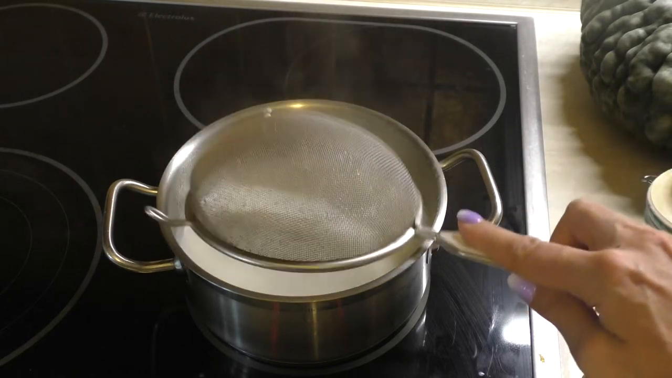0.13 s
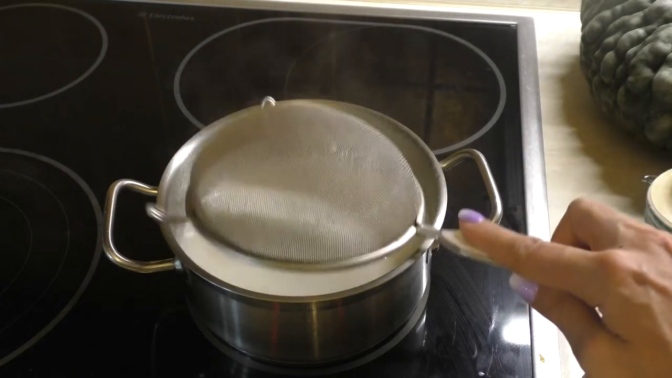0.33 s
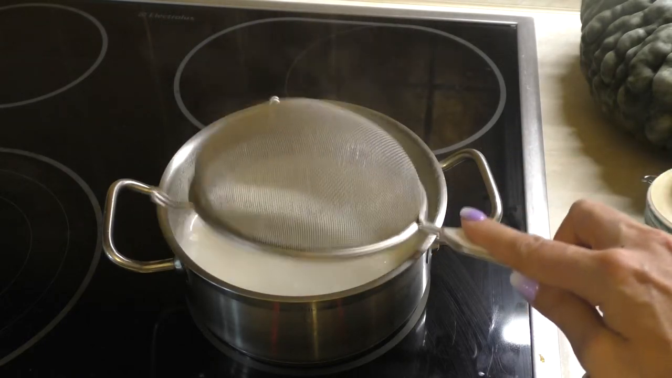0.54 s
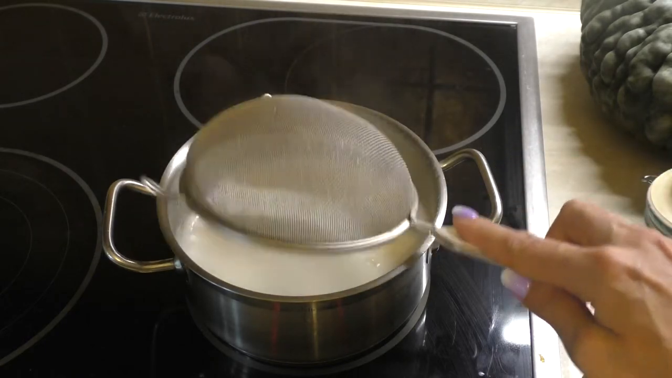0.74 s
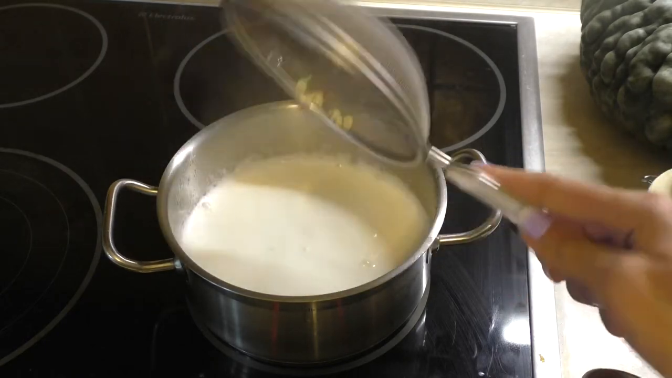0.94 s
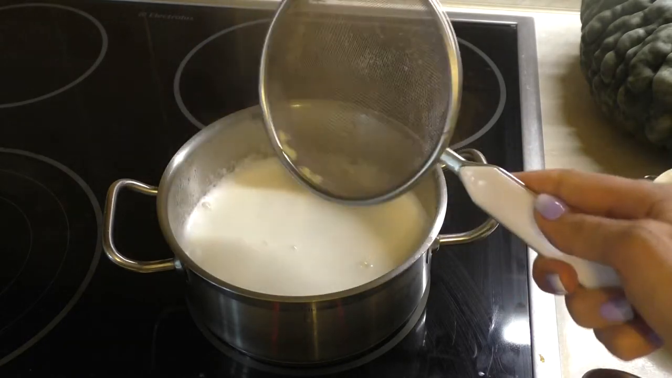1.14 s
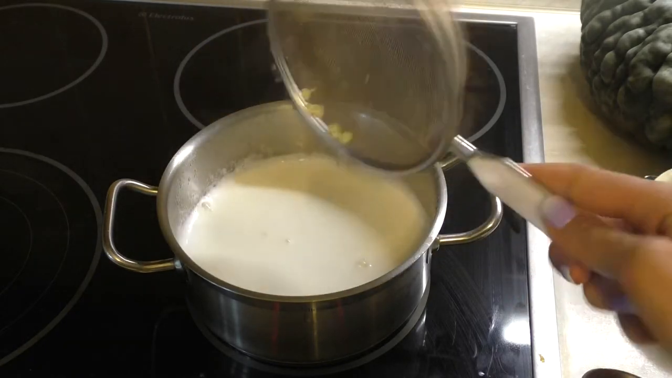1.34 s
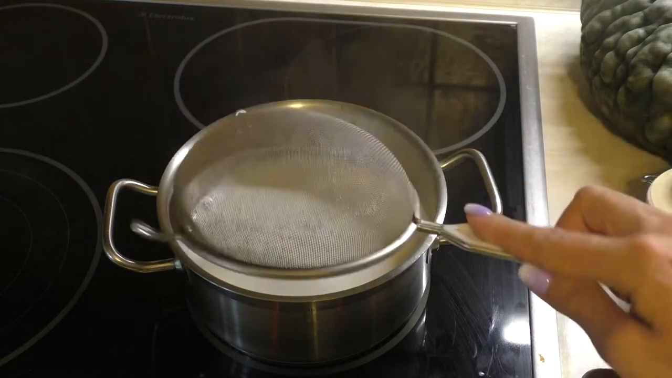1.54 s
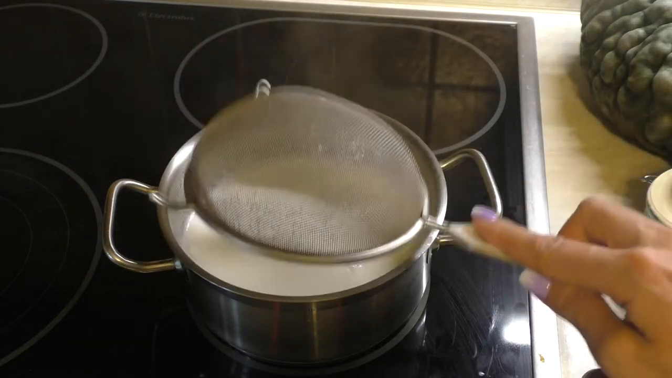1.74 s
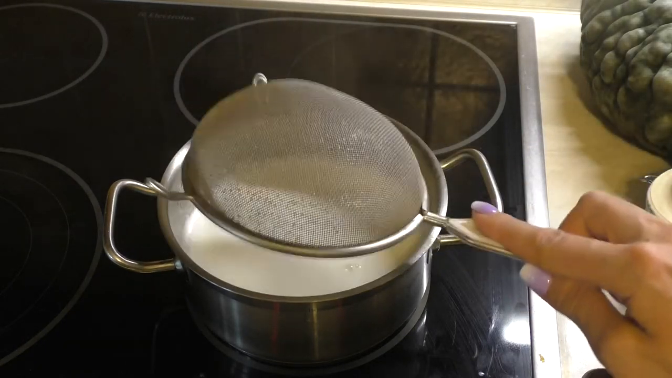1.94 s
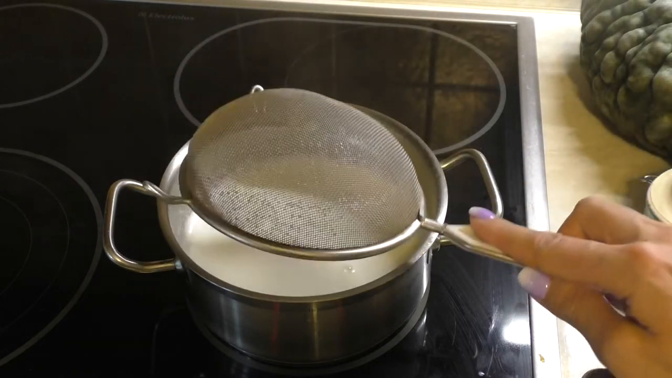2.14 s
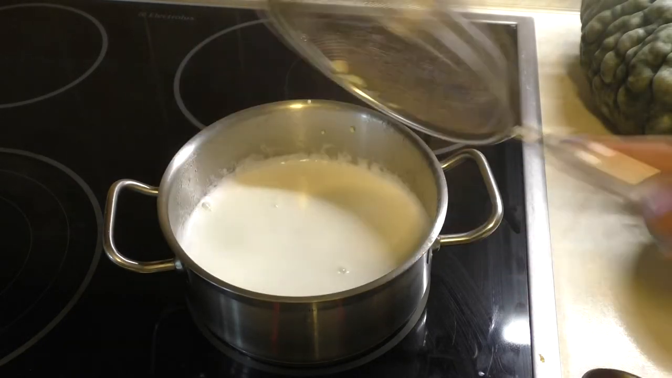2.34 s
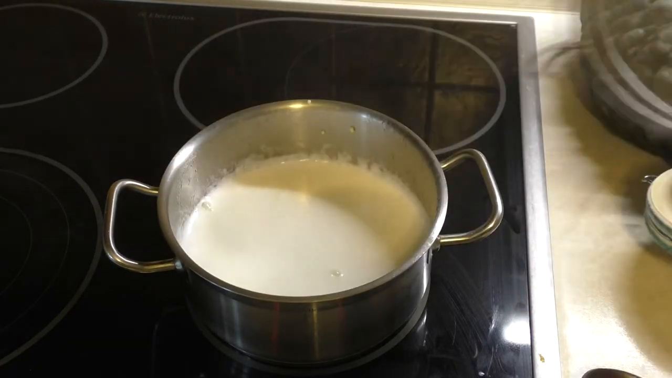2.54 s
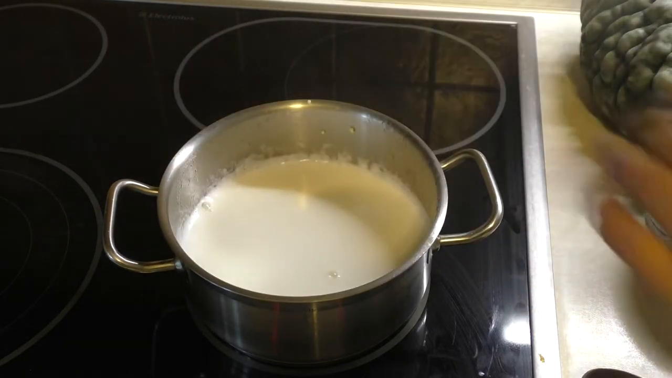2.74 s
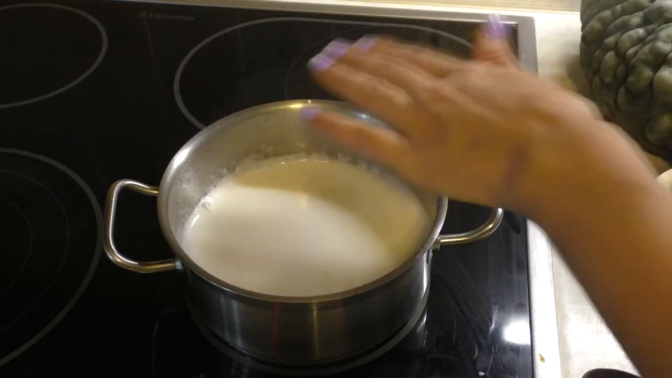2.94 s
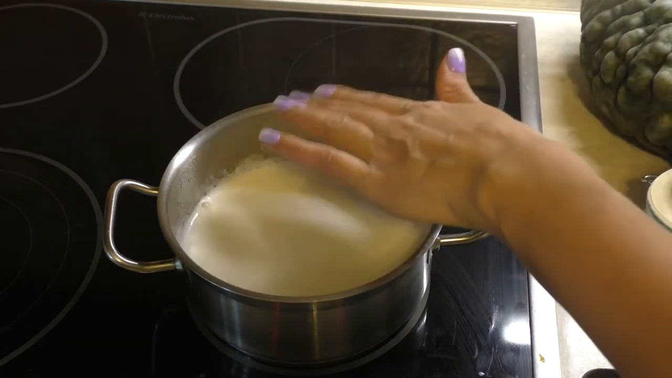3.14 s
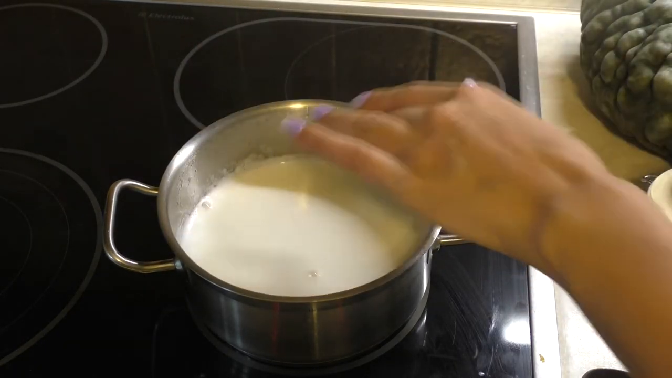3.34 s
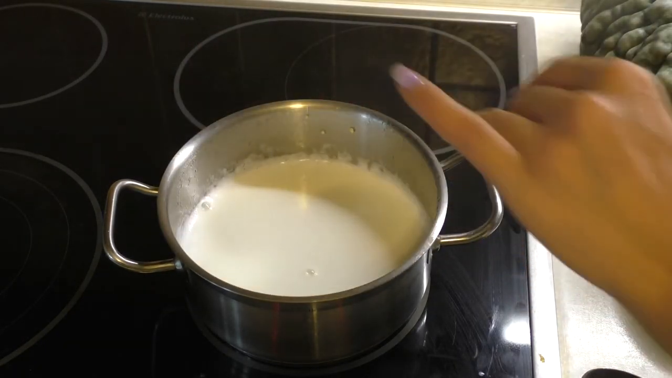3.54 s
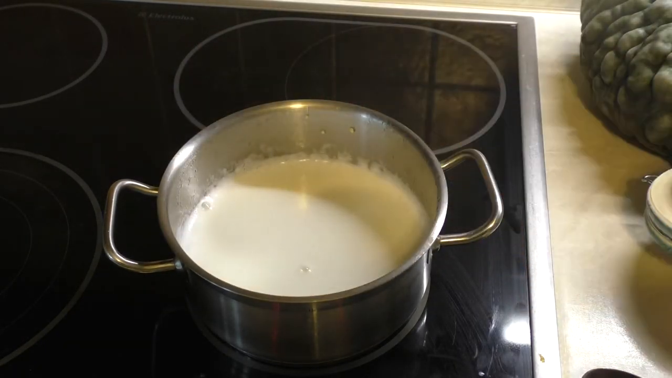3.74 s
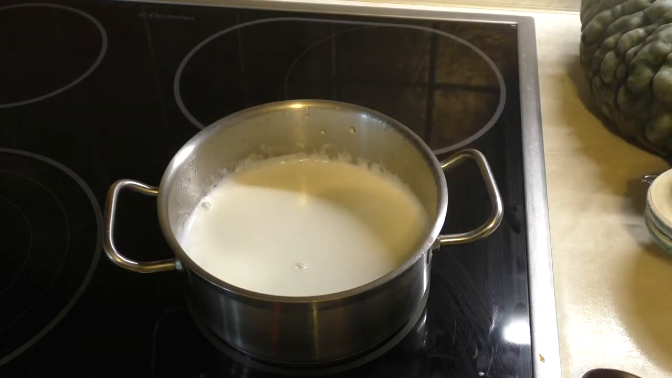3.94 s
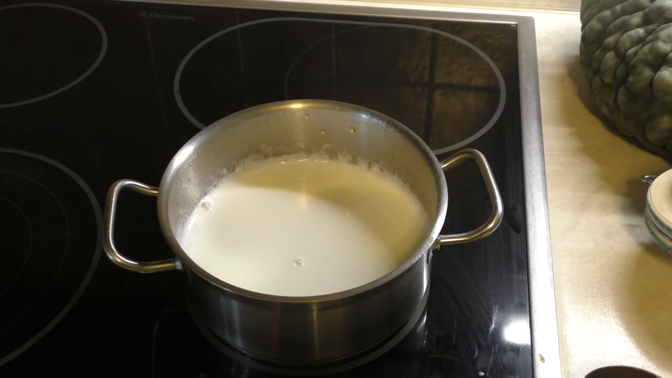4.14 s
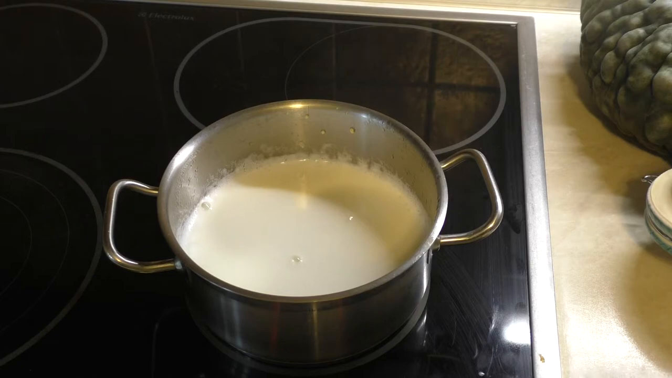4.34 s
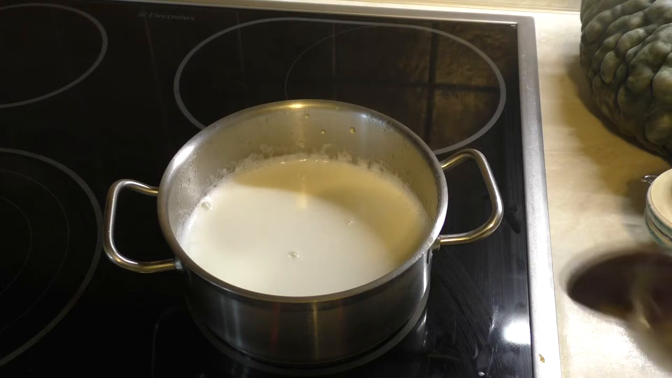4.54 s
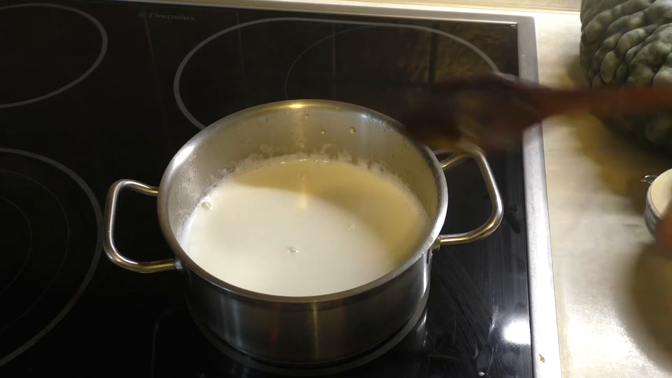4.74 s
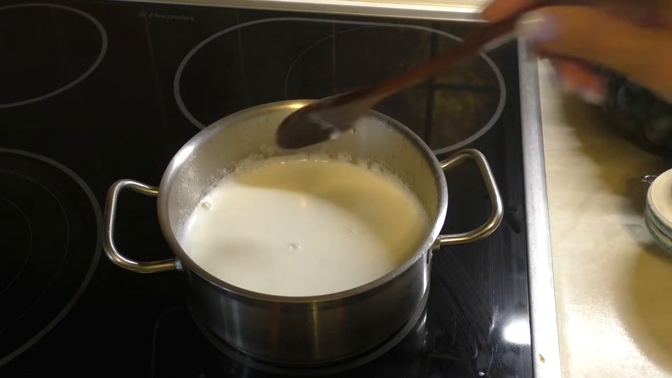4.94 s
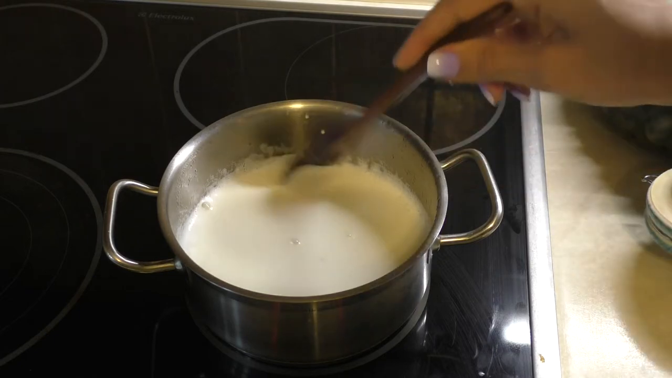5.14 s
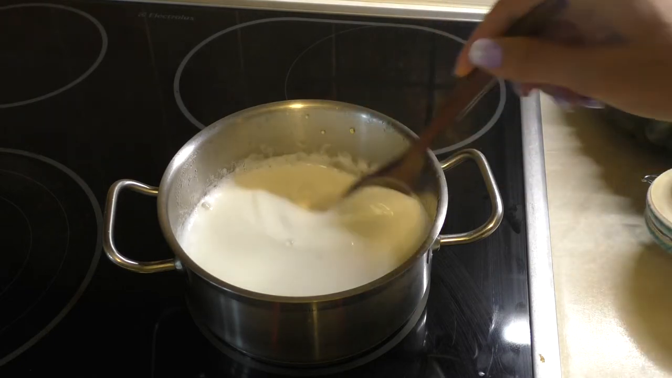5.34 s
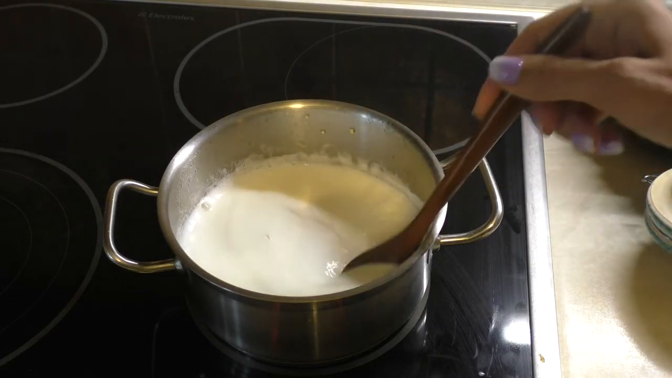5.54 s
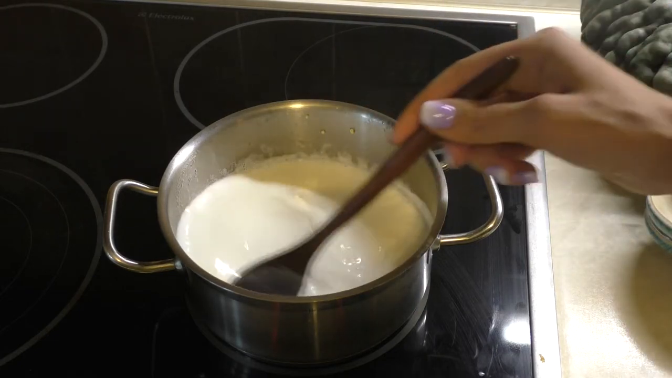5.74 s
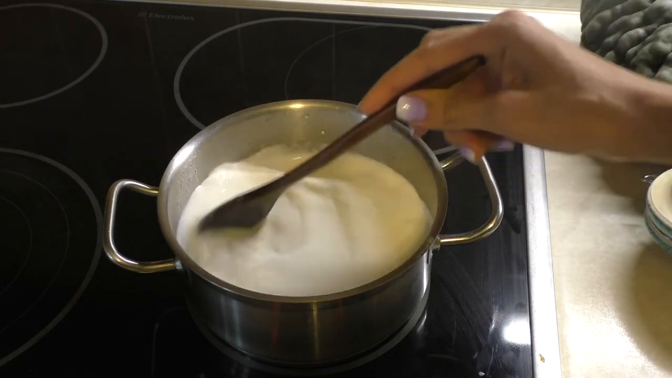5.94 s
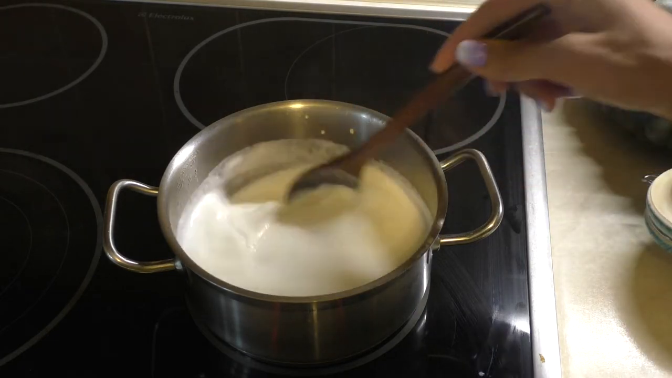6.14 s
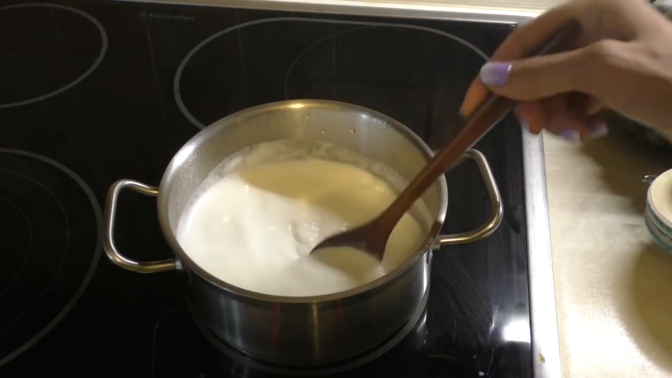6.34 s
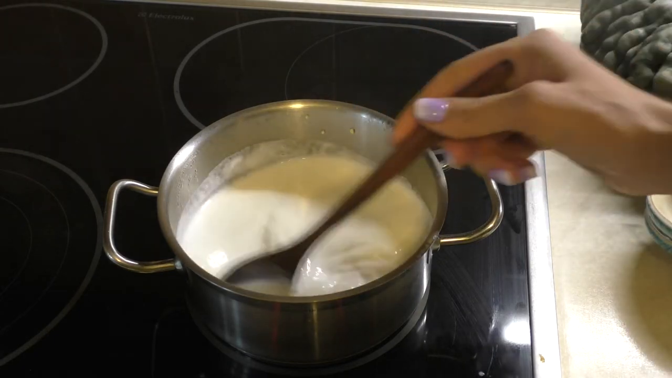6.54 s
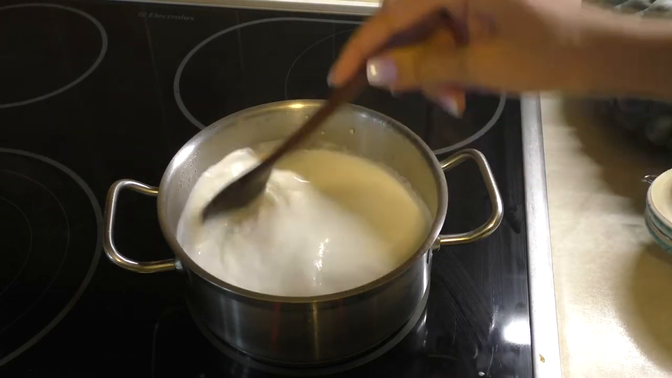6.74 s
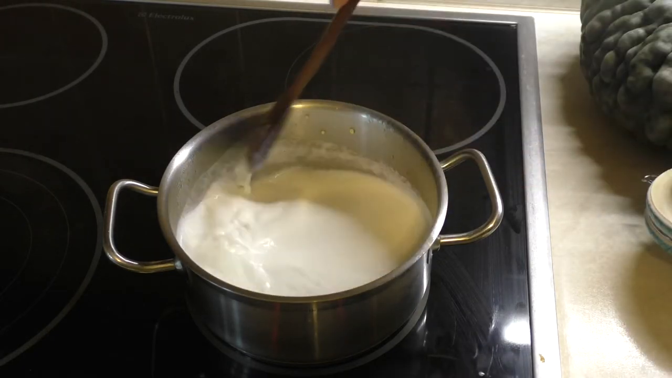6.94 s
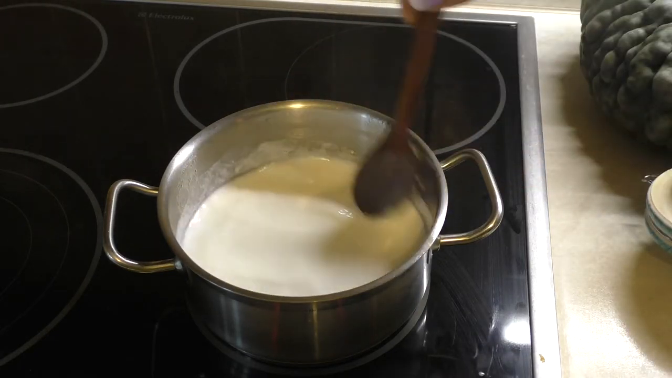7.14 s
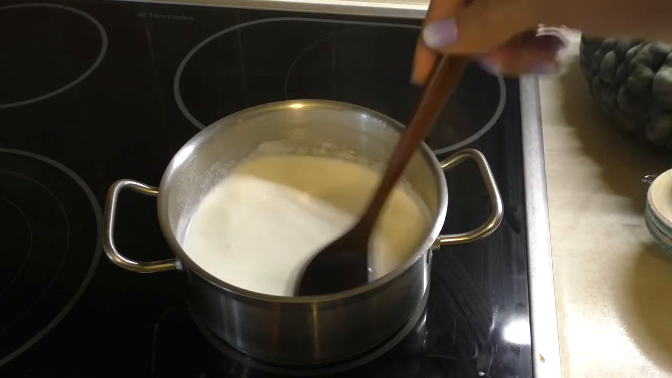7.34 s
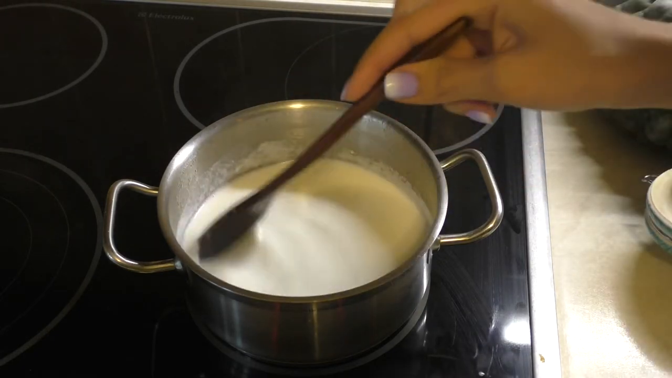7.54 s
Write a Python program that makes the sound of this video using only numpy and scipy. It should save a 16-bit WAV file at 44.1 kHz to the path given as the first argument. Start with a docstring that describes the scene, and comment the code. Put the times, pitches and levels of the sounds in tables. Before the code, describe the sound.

Sharp metallic clicks with rattling mesh: five evenly spaced sieve taps on a pan rim, a pause, then three more. Things are put down with a hard clatter on a worktop, followed by one light clink. A wooden spoon clacks against the steel, swishes softly through the milk, knocks again and rubs along the wall. Near microphone, short room reverberation, faint steady stove whir.

```python
"""A wire sieve taps the rim of a steel saucepan of milk: contact noise, ringing hoop modes, jangling wire noise.
It is then put down among utensils: knocks on and around the counter, tinks, a clink. Low modes thump throughout.
A wooden spoon knocks the pan (noise and modes), stirs the milk (filtered grains) and scrapes the wall (friction).
The hob whirs and hums (noise and a sine). A small kitchen answers; the gain ducks after each loud blow."""
import sys
import numpy as np
from scipy import signal
from scipy.fft import rfft, irfft, next_fast_len
from scipy.io import wavfile
from scipy.ndimage import uniform_filter1d, map_coordinates

SR = 44100
rng = np.random.default_rng(int(sys.argv[2]) if len(sys.argv) > 2 else 0)


def wav_out(sig):
    """Save sig, one row per channel (or a flat mono array), as 16-bit PCM at SR to the path in sys.argv[1]."""
    wavfile.write(sys.argv[1], SR, np.round(np.clip(np.atleast_2d(sig).T, -1, 1) * 32767).astype(np.int16))


N = 334719
TIME = np.arange(N) / SR
AGE = np.arange(SR) / SR


def amp(db):
    """Decibels to gain."""
    return 10 ** (np.asarray(db) / 20)


def unit(x):
    """Scale to rms 1."""
    return x / np.sqrt(np.mean(x ** 2) + 1e-20)


def fade(t, t60_s):
    """Exponential decay by 60 dB in t60_s, at least 1 ms."""
    return np.exp(-np.log(1000) * t / np.maximum(t60_s, 1e-3))


def along(points, hz, axis=1):
    """One column of a table, interpolated over log frequency."""
    columns = np.transpose(points)
    return np.interp(np.log(hz + 1), np.log(columns[0] + 1), columns[axis])


def wobble(knots_hz, size=N):
    """Smooth random curve through knots_hz normal random knots a second."""
    knots = rng.standard_normal(int(size * knots_hz / SR) + 4)
    return map_coordinates(knots, [TIME[:size] * knots_hz])


def hump(peak_s, length_s):
    """Gain of a raised-cosine swell, length_s from end to end."""
    return np.cos(np.pi * np.clip((TIME - peak_s) / length_s, -.5, .5)) ** 2


def grains(rate_hz, spread_db):
    """Random impulses of uneven size and sign, rate_hz a second on average."""
    chance, size, sign = rng.random(N), rng.standard_normal(N), rng.standard_normal(N)
    return (chance < rate_hz / SR) * amp(spread_db * size) * np.sign(sign)


def filtered(x, response):
    """x times a response of frequency."""
    n = x.shape[-1]
    padded = next_fast_len(n + SR // 4)
    spectrum = rfft(x, padded) * response(np.fft.rfftfreq(padded, 1 / SR))
    return irfft(spectrum, padded)[..., :n]


def coloured(x, spectrum, size=2048):
    """Causal minimum-phase filter with the given spectrum, by folding its cepstrum."""
    cepstrum = irfft(np.log(amp(along(spectrum, np.fft.rfftfreq(size, 1 / SR)))))
    cepstrum[1:size // 2] *= 2
    cepstrum[size // 2 + 1:] = 0
    impulse = irfft(np.exp(rfft(cepstrum)))
    return signal.fftconvolve(x, impulse)[:len(x)]


def gliding(x, hz, width_hz):
    """x through one resonance whose frequency moves: shift to 0 Hz, low-pass, shift back; rms 1."""
    turn = np.exp(2j * np.pi * np.cumsum(hz) / SR)
    pole = np.exp(-np.pi * width_hz / SR)
    return unit(np.real(turn * signal.lfilter([1 - pole], [1, -pole], x / turn)))


def add(track, s, sound):
    """Mix a sound into the track at time s, cut at both ends of the track."""
    start = round(s * SR)
    sound = sound[:, max(-start, 0):N - start]
    track[:, max(start, 0):][:, :sound.shape[1]] += sound


def ring(modes, scatter_db=2):
    """Decaying sines with random strengths and phases, each detuned a little at random."""
    hz, db, t60_s = np.transpose(modes)[:, :, None]
    hz = hz * (1 + .0015 * rng.standard_normal(hz.shape))
    strength = amp(db + scatter_db * rng.standard_normal(hz.shape))
    phase = rng.uniform(0, 2 * np.pi, hz.shape)
    tones = strength * fade(AGE, t60_s) * np.sin(2 * np.pi * hz * AGE + phase)
    return np.sum(tones, 0) * (1 - fade(AGE, 0.0053))


# Extra level per dB of hardness for thud, clank, clack and click, in dB per dB.
HARDNESS_DB_PER_DB = (-0.61, -0.26, 0.45, 1.15)


def blow(voice_db, db, hardness_db=0):
    """Thud, clank, clack and click of one blow: the harder the contact, the more treble."""
    return db + np.array(voice_db) + hardness_db * np.array(HARDNESS_DB_PER_DB)


# Edges of the thud, clank, clack and click bands, in Hz.
BAND_EDGES_HZ = [45, 700, 2400, 5000, 16000]


def contact(spectrum, levels_db, t60_s, crack=0.55, size=8192):
    """A crack and a decaying noise cloud, split in bands set to levels_db (energy as rms over 10 ms)."""
    t = AGE[:size]
    onset = 1 - fade(t, t60_s - .06)  # long contacts are slides and set in softly
    decay = fade(t, t60_s) + crack * fade(t, 0.002)
    cloud = coloured(rng.standard_normal(size) * onset * decay, spectrum)
    sound = np.zeros(SR)
    for low_hz, high_hz, db in zip(BAND_EDGES_HZ, BAND_EDGES_HZ[1:], levels_db):
        sos = signal.butter(4, [low_hz, high_hz], "band", fs=SR, output="sos")
        band = signal.sosfilt(sos, cloud)
        sound[:size] += amp(db) * band / np.sqrt(np.sum(band ** 2) / (.01 * SR))
    return sound


# Rim strike and its rebound, each: thud, clank, clack, click in dB re the blow's base level.
TAP_VOICE_DB = (-4.5, -5.5, -5.5, 13)
REBOUND_VOICE_DB = (-7, -0.5, 0.5, 11.5)
CHATTER_S, CHATTER_DB = .0035, -8.5  # last touch: delay after the rebound, level re the rebound


def rim_contacts(db, hardness_db, gap_s, rebound_db, body_db):
    """Strike, rebound and last chatter of one tap: yields (delay in seconds, band levels in dB)."""
    yield 0, blow(TAP_VOICE_DB, db, hardness_db) + [0, body_db, body_db, 0]
    yield gap_s, blow(REBOUND_VOICE_DB, db + rebound_db, hardness_db)
    yield gap_s + CHATTER_S, blow(REBOUND_VOICE_DB, db + rebound_db + CHATTER_DB, hardness_db)


WIRE_SPACING_HZ, WIRE_SCATTER_DB = 70, 4  # random unevenness over frequency
RATTLE_KNOTS_HZ, RATTLE_DB = 220, 2  # loose mesh beating on its hoop


def wires(spectrum, t60_s):
    """Crowded wire resonances as unevenly coloured noise, redrawn per tap, rattling as it decays."""
    favours = rng.standard_normal(int(SR / WIRE_SPACING_HZ))

    def response(hz):
        uneven_db = WIRE_SCATTER_DB * map_coordinates(favours, [hz / WIRE_SPACING_HZ])
        return amp(along(spectrum, hz)) * amp(uneven_db)

    crowd = filtered(rng.standard_normal(SR), response)
    rattle = amp(RATTLE_DB * wobble(RATTLE_KNOTS_HZ, size=SR))
    return unit(crowd * rattle) * fade(AGE, t60_s)


# Sieve taps on the rim, the first already ringing at the start. Each row: start in seconds, base level in dB,
# hardness in dB, rebound delay in seconds, rebound re tap in dB, extra clank and clack in dB, mesh pitch in Hz,
# hoop ring gain in dB, mesh jangle in dB, shimmer in dB.
RIM_TAPS = [(-0.115, -32.5, 4.5, 0.0089, -6.5, 9.5, 6200, -49.5, -33.5, -44),
            (0.0731, -41, 4, 0.0063, 5, 4, 6200, -49.5, -31.5, -55.5),
            (0.263, -40.5, 4.5, 0.0072, 4.5, 0, 6400, -49, -38, -44),
            (0.449, -41.5, 3.5, 0.0049, 5.5, 2.5, 6300, -53, -35.5, -50),
            (0.641, -39.5, 4.5, 0.0028, -5, -2.5, 7200, -61, -47.5, -35.5),
            (1.516, -71, 5.5, 0.061, -12, 12, 6400, -102, -67, -84),
            (1.6557, -36.5, 1, 0.011, 5.5, 11, 6050, -51, -31, -33),
            (1.823, -39.5, 2.5, 0.0035, 3.5, 13.5, 6500, -60, -39, -40),
            (1.9955, -37, 3, 0.018, -4.5, 1, 6030, -54.5, -41.5, -36)]
# Colour of sieve on rim. Each row: frequency in Hz, relative level in dB.
SIEVE_COLOUR = [(60, -0.5), (400, 4), (600, -11.5), (850, -15), (1100, -2.5), (1800, -5), (2200, -20.5),
                (2850, -21.5), (4400, -24.5), (5000, -22.5), (6700, -6), (8000, -13.5), (9100, 1.5),
                (10100, -6.5), (10900, 1.5), (12500, -10.5), (14300, -11.5), (15400, -16.5)]
# Hoop and rim modes. Each row: frequency in Hz, relative level in dB, T60 in seconds.
HOOP_MODES = [(393, -7, .4), (737, -14, .6), (1075, -9, .45), (1505, -7, .45), (1670, -3, .45),
              (1890, -10, .45), (2148, -8, .4), (2400, -4, .4), (2465, -3, .45), (3305, -3, .25),
              (3450, -6, .45), (3540, -1, .42), (5733, 0, .4), (5905, -1, .4), (6228, 0, .4),
              (6365, 1, .38), (6848, 5, .42), (7155, 4, .4), (7690, 1, .35), (8955, 8, .18),
              (9220, 10, .17), (9790, 2, .25), (10135, 5, .2), (10830, 13, .12), (11081, 8, .18),
              (11400, 6, .18), (12865, 1, .22), (15211, 2, .17)]
# Jangling wires before the pitch shift, then the finest wires. Each row: frequency in Hz, relative level in dB.
MESH_COLOUR = [(700, -32.5), (1600, 5.5), (2400, 0), (4700, -4), (5700, 7), (6400, 9), (7900, -0.5),
               (9400, -15), (11500, -8), (13500, -1), (15500, -23)]
SHIMMER_COLOUR = [(5000, -38), (8300, -10), (9300, 5.5), (10300, -2), (11500, -2), (13300, -10),
                  (15500, -22.5)]
MESH_HZ = 6400  # main resonance in MESH_COLOUR
JANGLE_T60_S, SHIMMER_T60_S = 0.45, 0.295


def sieve():
    """Taps chatter on the rim and leave hoop and mesh ringing; each tap shifts the mesh colour to its pitch."""
    track = np.zeros((2, N))
    for s, *strike, mesh_hz, hoop_db, jangle_db, shimmer_db in RIM_TAPS:
        for delay_s, levels_db in rim_contacts(*strike):
            click = contact(SIEVE_COLOUR, levels_db, t60_s=0.043, crack=0.13)
            add(track, s + delay_s, in_kitchen(click, wet_db=-3.5, left_db=0.44))
        mesh = np.array(MESH_COLOUR) * [mesh_hz / MESH_HZ, 1]
        hoop = amp(hoop_db) * ring(HOOP_MODES, scatter_db=3)
        jangle = amp(jangle_db) * wires(mesh, JANGLE_T60_S)
        shimmer = amp(shimmer_db) * wires(SHIMMER_COLOUR, SHIMMER_T60_S)
        add(track, s, in_kitchen(hoop + jangle + shimmer, wet_db=-5.5))
    return track


# Grazed metal. Each row: peak in seconds, length in seconds, pitch in Hz, level before the swell in dB.
METAL_BUZZES = [(0.12, 0.014, 6700, -34), (0.241, 0.018, 10500, -56), (1.805, 0.036, 10200, -46.5),
                (5.15, .025, 11500, -58)]
BUZZ_WIDTH_HZ = 1200  # offset at which the band falls to 1/e


def buzzes():
    """Lightly grazed metal: brief swells of narrow-band noise."""
    sound = np.zeros(N)
    for s, length_s, pitch_hz, db in METAL_BUZZES:
        band = filtered(rng.standard_normal(N), lambda hz: np.exp(-((hz - pitch_hz) / BUZZ_WIDTH_HZ) ** 2))
        sound += amp(db) * unit(band) * hump(s, length_s)
    return in_kitchen(sound, wet_db=-27)


# Spoon on pan. Each row: start in seconds, base level in dB, hardness in dB, extra thud in dB,
# wall ring re base in dB, room level in dB, height from 0 low on the wall to 1 at the rim.
SPOON_KNOCKS = [(5.0811, -37.5, 2.5, -6.5, -13.5, -3, 1), (5.181, -51.5, -28.5, 3, -28, -8.5, .5),
                (5.299, -64, -17, 9, -24, -12, 0), (5.3645, -39.5, 0, 4, -7.5, -4.5, 0),
                (5.3711, -46, -16, 4, -7, 0, 0.082), (5.476, -54.5, -8, -4, -8, 0, 0),
                (5.761, -65.5, 12, -6, -33, 1, 0.076), (6.112, -53, 0.5, 0.5, -29, -2, 0),
                (6.713, -59, 0, 11, -25, -9, 0), (6.819, -56, -16, -3, -31, -5, .5),
                (6.8452, -33, 8.5, 7, -27, -2.5, 0.56), (7.539, -55, -7, -7, -34, -11, 0),
                (7.5853, -38.5, -8, -22, -22, 5, 0)]
# Thud, clank, clack, click in dB re the base level.
SPOON_VOICE_DB = (-13, 1, -8, -8)
# Colour of wood on steel. Each row: frequency in Hz, relative level in dB.
WOOD_COLOUR = [(60, -9.5), (200, -15.5), (380, -0.5), (560, -16), (750, -10), (1100, 12), (1400, 10),
               (1950, 9), (2500, -5.5), (3200, 0.5), (4500, -7.5), (6500, -17.5), (10000, -19.5),
               (15500, -36)]
# Pan wall. Each row: frequency in Hz, level struck at the rim in dB, level struck low in dB, T60 in seconds.
PAN_WALL_MODES = [(350, -12, -16, .25), (737, -8, -17, .35), (958, -20, -5, .3), (1093, -12, -7, .4),
                  (1163, -14, 0, .3), (1295, -8, -11, .25), (1512, -1, 1, .36), (1670, 0, -10, .28),
                  (1895, -3, -12, .35), (2143, -14, -8, .4), (2390, -13, -15, .3), (2670, -22, -11, .4),
                  (2934, -6, -14, .4), (4140, -12, -22, .3), (4813, -18, -20, .3), (5760, -14, -19, .35),
                  (5870, -22, -16, .35), (5986, -21, -19, .4), (6374, -20, -20, .45), (7127, -22, -18, .25),
                  (9200, -20, -15, .4), (10900, -26, -19, .25)]
# Lowest ring of the pan. Each row: frequency in Hz, relative level in dB, T60 in seconds.
PAN_HOLLOW_MODES = [(405, -3, .2), (420, 0, .28)]
HOLLOW_RING_DB = -25  # re base level plus extra thud
LEAN_KNOTS_HZ, LEAN_DB = 130, 3  # the spoon judders on the ringing wall


def spoon():
    """Wood knocks ring the steel wall; strike height blends low-wall and rim mode levels."""
    track = np.zeros((2, N))
    mode_hz, rim_db, low_db, t60_s = np.transpose(PAN_WALL_MODES)
    for s, db, hardness_db, thud_db, ring_db, room_db, height in SPOON_KNOCKS:
        levels_db = blow(SPOON_VOICE_DB, db, hardness_db) + [thud_db, 0, 0, 0]
        knock = contact(WOOD_COLOUR, levels_db, t60_s=0.04)
        mode_db = low_db + np.clip(height, 0, 1) * (rim_db - low_db)
        leaning = amp(LEAN_DB * wobble(LEAN_KNOTS_HZ, size=SR))
        wall = amp(db + ring_db) * leaning * ring(np.transpose([mode_hz, mode_db, t60_s]))
        hollow = amp(db + thud_db + HOLLOW_RING_DB) * ring(PAN_HOLLOW_MODES)
        add(track, s, in_kitchen(knock, wet_db=room_db) + in_kitchen(wall + hollow, wet_db=0))
    return track


# Wall damped by the spoon. Each row: frequency in Hz, relative level in dB, width in Hz.
RUBBED_WALL_MODES = [(958, -2, 35), (1290, -5, 30), (1750, -5, 70), (2390, 1, 40), (3000, -10, 70),
                     (3940, -8, 100), (6010, -5, 70), (7810, -3, 80), (8130, -6, 80), (10500, -7, 120),
                     (11900, -7, 120)]
RUB_DRIFT = .035  # random bend, share of the frequency


def through_pan(x, wander_db=4):
    """Friction rings the wall's modes; each swells, fades and bends at random."""
    sound = np.zeros(N)
    for hz, db, width_hz in RUBBED_WALL_MODES:
        level = amp(db + wander_db * wobble(23))
        sound += level * gliding(x, hz * (1 + RUB_DRIFT * wobble(14)), width_hz)
    return unit(sound)


# Spoon along the wall. Each row: time in seconds, level in dB before the mix trim in scrape().
SCRAPE_LEVEL = [(6.92, -64), (6.991, -48.5), (7.06, -47.5), (7.115, -44), (7.16, -50.5), (7.205, -47),
                (7.245, -65), (7.35, -63.5)]
# Colour of grit and squeaks. Each row: frequency in Hz, relative level in dB.
GRIT_COLOUR = [(600, -30), (950, -4.5), (1700, -0.5), (2400, -7.5), (3000, -10.5), (4000, -8), (5200, -14),
               (6100, -7.5), (6900, -9.5), (7900, -2.5), (11500, -6.5), (13500, -17.5), (15800, -20.5)]


def squeaks(count=260, size=1300, glide=0.027):
    """Wet wood sticks and slips: brief, slightly gliding tones at random points of the scrape."""
    track = np.zeros((1, N))
    t = AGE[:size]
    start_s, end_s = SCRAPE_LEVEL[0][0], SCRAPE_LEVEL[-1][0]
    for when, pitch, bend, loud in rng.random((count, 4)):
        hz = 900 + 12000 * pitch
        bent_t = t * (1 + glide * (bend - .5) * t / t[-1])
        tone = np.sin(2 * np.pi * hz * bent_t) * np.hanning(size)
        centre_s = start_s + when * (end_s - start_s)
        add(track, centre_s - t[-1] / 2, loud * amp(along(GRIT_COLOUR, hz)) * tone[None])
    return track[0] / np.sqrt(np.mean(track[0, track[0] != 0] ** 2))


def swell(rows):
    """Gain from a dB curve, -120 dB outside its span."""
    columns = np.transpose(rows)
    return amp(np.interp(TIME, columns[0], columns[1], left=-120, right=-120))


# Resonance sinking as the spoon travels. Each row: time in seconds, frequency in Hz.
RUB_GLIDE = [(6.94, 1900), (7.02, 1560), (7.07, 1270), (7.1, 1028), (7.21, 993), (7.3, 930)]
RUB_WIDTH_HZ, RUB_DB = 55, -4  # level within the scrape mix
STUTTER_KNOTS_HZ, STUTTER_DB = 70, 1.5  # the wood catches and lets go


def scrape():
    """Wet wood stutters along the wall: dense slips, chirping squeaks, wall ring and a sinking rub."""
    slips = grains(rate_hz=6000, spread_db=2) * amp(STUTTER_DB * wobble(STUTTER_KNOTS_HZ))
    singing = .9 * through_pan(slips) + .65 * squeaks()
    rub_hz = np.interp(TIME, *np.transpose(RUB_GLIDE))
    rub = amp(RUB_DB) * gliding(slips, rub_hz, RUB_WIDTH_HZ)
    grit = .95 * unit(coloured(slips, GRIT_COLOUR))
    return amp(-4.0) * (grit + singing + rub) * swell(SCRAPE_LEVEL)


# Drag under the milk. Each row: frequency in Hz, relative level in dB.
GRAZE_COLOUR = [(300, -22), (900, -21), (1400, 5), (1800, -5), (2500, -6), (3400, -8), (4200, -4),
                (5200, -15), (15500, -28)]
GRAZE_S, GRAZE_LENGTH_S, GRAZE_DB = 6.22, 0.39, -62.5  # peak time, length, level before the swell


def graze():
    """The spoon drags softly over the bottom: coloured, stuttering grains."""
    drag = unit(coloured(grains(rate_hz=3000, spread_db=3), GRAZE_COLOUR))
    stutter = amp(STUTTER_DB * wobble(STUTTER_KNOTS_HZ))
    return amp(GRAZE_DB) * drag * stutter * hump(GRAZE_S, GRAZE_LENGTH_S)


# Brisker sweeps through the milk. Each row: peak in seconds, length in seconds, peak level in dB.
MILK_SWEEPS = [(5.312, 0.53, -63.5), (5.475, 0.32, -63.5), (6.207, 0.62, -59), (6.6, 0.47, -60.5),
               (6.781, 0.07, -56.5), (7.245, 0.15, -54.5)]
STIR_FROM_S, STIR_DB = 5.2, -67  # spoon enters the milk; steady froth level
FIRST_SLOSH_S, SLOSH_EVERY_S, SLOSH_LENGTH_S = 5.66, .472, 0.13
SLOSH_DB, SWIRL_DB = -60, -86  # pan's hollow: slosh peaks, level between them


def spoon_motion():
    """Gains of froth and hollow: steady stirring, brisker sweeps, regular sloshes."""
    in_milk = TIME > STIR_FROM_S
    sweeps = sum(amp(db) * hump(s, length_s) for s, length_s, db in MILK_SWEEPS)
    slosh_times_s = np.arange(FIRST_SLOSH_S, SCRAPE_LEVEL[-1][0], SLOSH_EVERY_S)
    sloshes = sum(hump(s, SLOSH_LENGTH_S) for s in slosh_times_s)
    froth_gain = np.hypot(amp(STIR_DB) * in_milk, sweeps)
    hollow_gain = np.hypot(amp(SWIRL_DB) * in_milk, amp(SLOSH_DB) * sloshes)
    return froth_gain, hollow_gain


# Colour of the froth. Each row: frequency in Hz, relative level in dB.
MILK_COLOUR = [(120, -23), (200, -9), (293, -23), (462, 6.5), (677, -24), (742, -5), (1400, 5.5),
               (3300, -5), (10000, -6), (15500, -12.5)]
HOLLOW_HZ, HOLLOW_HALF_WIDTH_HZ = 420, 73  # air resonance above the milk; -6 dB at the half width


def stirring():
    """Froth crackles as grains, the pan's hollow hums as resonant noise, the wood drags and scrapes."""
    froth_gain, hollow_gain = spoon_motion()
    froth = unit(coloured(grains(rate_hz=2200, spread_db=1.5), MILK_COLOUR)) * froth_gain
    noise = rng.standard_normal(N)
    hum = filtered(noise, lambda hz: 1 / (1 + 1j * (hz - HOLLOW_HZ) / HOLLOW_HALF_WIDTH_HZ) ** 2)
    hollow = unit(hum) * hollow_gain
    return in_kitchen(froth + hollow + graze() + scrape(), wet_db=-4.5)


# Knocks on and around the counter. Each row: start in seconds, base level in dB, hardness in dB,
# T60 in seconds, own ring re the clack in dB.
COUNTER_KNOCKS = [(1.158, -57.5, -3, 0.017, -19), (3.039, -56, -17, 0.02, -11), (3.6596, -30, 3, 0.024, 12),
                  (3.7548, -34.5, -9.5, 0.023, 9), (3.7589, -32, 3.5, 0.021, -8),
                  (3.7671, -45, 7.5, .02, 0), (3.784, -48, 3, 0.026, 4), (3.821, -41.5, -4.5, 0.019, -12),
                  (3.9256, -52.5, 9.5, 0.12, 3), (3.966, -50, 8.5, 0.14, -5), (3.992, -57, 0, 0.037, 1),
                  (4.072, -53.5, -5, 0.016, 6)]
# Utensil clinks. Each row: start in seconds, base level in dB.
UTENSIL_CLINKS = [(4.3367, -49)]
# Small things touching. Each row: start in seconds, pitch in Hz, level in dB, T60 in seconds.
COUNTER_TINKS = [(3.785, 2860, -34, 0.071), (3.967, 2230, -44, 0.086), (4.073, 2620, -39.5, 0.042)]
# Knock and clink, each: thud, clank, clack, click in dB re the base level.
COUNTER_VOICE_DB = (-15, -1.5, -5, -7.5)
CLINK_VOICE_DB = (-10.5, -1.5, 6, 16)
# Colours of knock and clink. Each row: frequency in Hz, relative level in dB.
WORKTOP_COLOUR = [(60, -14), (170, -15), (290, -4), (420, -4), (540, -4), (660, -2), (820, -9), (1100, 0),
                  (1600, -3), (1900, -7), (2400, -5), (3200, 0), (4200, -2), (4800, -10), (5300, -12),
                  (6000, -9), (7200, -12), (10500, -11), (15500, -24)]
UTENSIL_COLOUR = [(100, -21), (750, -28), (1430, -7), (3000, -29), (3700, -14), (4700, -18), (5380, -2),
                  (6100, -16), (6850, -3), (7600, -15), (8500, -5), (9600, -9), (10500, -2), (11500, -12),
                  (15500, -26)]
# Modes of board, hard ware and utensil. Each row: frequency in Hz, relative level in dB, T60 in seconds.
BOARD_MODES = [(205, -6, .2), (636, -4, .13), (1053, -1, .1), (1674, -3, .09), (2823, -3, .08)]
HARD_WARE_MODES = [(1130, -9, .03), (2520, -1, .03), (2790, -3, .035), (2950, -2, .025), (3110, 0, .025),
                   (3310, 2, .026), (3490, 0, .022), (3720, -2, .024), (4120, -10, .02)]
CLINK_MODES = [(1432, -17, .3), (3720, -14, .12), (5220, -5, .13), (5290, -4, .17), (5390, -2, .12),
               (5530, -3, .08), (6760, -7, .1), (6850, -4, .11), (8300, -10, .17), (8823, -8, .15),
               (10100, -7, .14), (10515, -3, .07)]


def counter():
    """Knocks to the right ring board and ware; single-mode tinks and a bright clink."""
    track = np.zeros((2, N))
    for s, db, hardness_db, t60_s, ring_db in COUNTER_KNOCKS:
        levels_db = blow(COUNTER_VOICE_DB, db, hardness_db)
        knock = contact(WORKTOP_COLOUR, levels_db, t60_s)
        board = amp(levels_db[0] - 2.0) * ring(BOARD_MODES)
        ware = amp(levels_db[2] + ring_db) * ring(HARD_WARE_MODES)
        add(track, s, in_kitchen(knock + board + ware, wet_db=1, left_db=-3.3))
    for s, hz, db, t60_s in COUNTER_TINKS:
        add(track, s, in_kitchen(amp(db) * ring([(hz, 0, t60_s)]), wet_db=-3))
    for s, db in UTENSIL_CLINKS:
        levels_db = blow(CLINK_VOICE_DB, db)
        clink = contact(UTENSIL_COLOUR, levels_db, t60_s=.028)
        clink += amp(levels_db[-1] - 11) * ring(CLINK_MODES)
        add(track, s, in_kitchen(clink, wet_db=-2.5))
    return track


# Dull bumps. Each row: start in seconds, gain in dB.
DULL_BUMPS = [(0.648, -47.5), (2.011, -49), (3.043, -53.5), (3.761, -50.5), (5.184, -60.5)]
# Each row: frequency in Hz, relative level in dB, T60 in seconds.
DULL_BUMP_MODES = [(91, 1.5, 0.16), (152.3, -1, 0.29), (233, 2.5, 0.071)]


def bumps():
    """Soft low thumps of sieve, pan and counter: three low modes."""
    track = np.zeros((2, N))
    for s, db in DULL_BUMPS:
        add(track, s, in_kitchen(amp(db) * ring(DULL_BUMP_MODES), wet_db=-14.0))
    return track


# Colour of the whir. Each row: frequency in Hz, relative level in dB.
WHIR_COLOUR = [(25, -12.5), (55, -3.5), (125, -5), (250, -4.5), (370, -6), (580, -20.5), (660, -10),
               (930, -10.5), (1200, -6.5), (2300, -10), (3800, -18), (5500, -21), (11000, -17),
               (15800, -23)]
# Each row: time in seconds, level in dB before trim and drift in hob().
WHIR_CURVE = [(0.0, -64), (2.5, -63.5), (4.0, -63.5), (4.6, -59.5), (7.59, -59)]


def hob():
    """Airy whir of diffuse coloured noise, plus a mains hum wavering in level and phase."""
    air = filtered(rng.standard_normal((2, N)), lambda hz: amp(along(WHIR_COLOUR, hz)))
    seconds, db = np.transpose(WHIR_CURVE)
    drift_db = .8 * wobble(2.3)
    whir = unit(spread(*air)) * amp(np.interp(TIME, seconds, db) - 0.5 + drift_db)
    hum = amp(-71.5 + 3.2 * wobble(16)) * np.sin(2 * np.pi * 99 * TIME + .5 * wobble(6.6))
    return whir + hum


# Stereo width of diffuse sound. Each row: frequency in Hz, side re mid in dB.
DIFFUSE_WIDTH = [(60, -12), (130, -6), (290, -7.5), (640, -9.5), (1410, -7), (3100, -4), (6820, -11),
                 (15000, -50)]


def spread(mid, side):
    """Two unrelated signals as a diffuse stereo field, its width set by frequency."""
    side = filtered(side, lambda hz: amp(along(DIFFUSE_WIDTH, hz)))
    return np.array([mid + side, mid - side])


# Kitchen tail. Each row: frequency in Hz, T60 in seconds, level in dB before wet_db.
KITCHEN_TAIL = [(99, 0.46, 7), (320, 0.47, 6.5), (710, 0.57, -4), (1800, 0.42, -3.5), (6900, 0.28, -3.5),
                (9730, 0.31, -7.5), (12800, 0.17, -15), (15500, 0.155, -2)]


def in_kitchen(x, wet_db, left_db=0, build_s=0.00045):
    """Direct sound plus a diffuse noise tail decaying by frequency; left_db is left re right."""
    hz, t, noise = signal.stft(rng.standard_normal((2, SR)), SR, nperseg=256)
    t60_s = np.maximum(along(KITCHEN_TAIL, hz), .05)[:, None]
    level = amp(along(KITCHEN_TAIL, hz, axis=2))[:, None]
    level = level * np.sqrt(2 * np.log(1000) / (t60_s * SR))  # equal energy for any T60
    tail = signal.istft(noise * level * fade(t, t60_s), SR, nperseg=256)[1][:, :SR]
    tail = tail * (1 - np.exp(-AGE / build_s))
    wet = signal.fftconvolve(x[None], spread(*tail), axes=1)[:, :len(x)]
    return (x + amp(wet_db) * wet) * amp([[left_db / 2], [-left_db / 2]])


def scene():
    """Everything at the stove."""
    return sieve() + buzzes() + spoon() + stirring() + counter() + bumps() + hob()


def gain_control(x, threshold_db=-31, slope=0.57, release_db_per_s=85, attack_s=0.0099):
    """Level above the threshold pulls the gain down; it climbs back at a steady rate in dB."""
    power = uniform_filter1d(np.mean(x ** 2, 0), size=88)  # 2 ms window
    level_db = 10 * np.log10(np.abs(power) + 1e-12)
    excess_db = slope * np.maximum(level_db - threshold_db, 0)
    recovery_db = release_db_per_s * TIME
    held_db = np.maximum.accumulate(excess_db + recovery_db) - recovery_db
    pole = np.exp(-1 / (attack_s * SR))
    return x * amp(-signal.lfilter([1 - pole], [1, -pole], held_db))


TOP_HZ = 16000


def record(dry):
    """Gain control, then a steep low-pass at TOP_HZ."""
    return filtered(gain_control(dry), lambda hz: 1 / np.sqrt(1 + (hz / TOP_HZ) ** 160))


dry = scene()
out = record(dry)
wav_out(out)
```